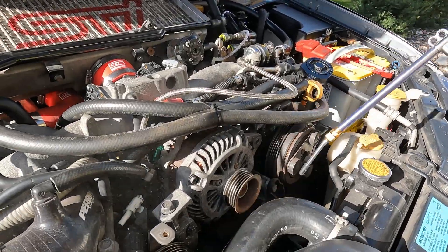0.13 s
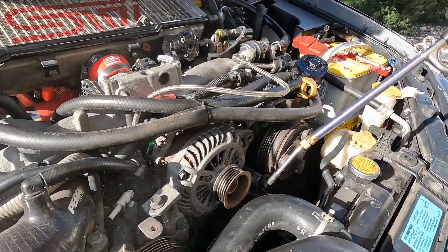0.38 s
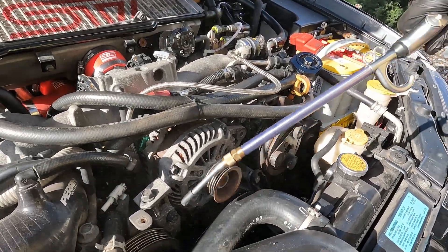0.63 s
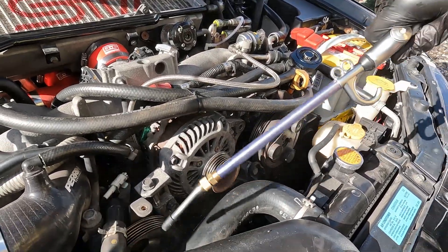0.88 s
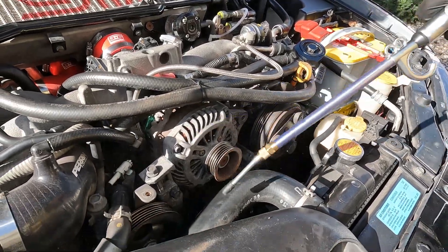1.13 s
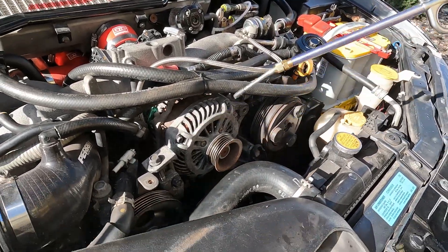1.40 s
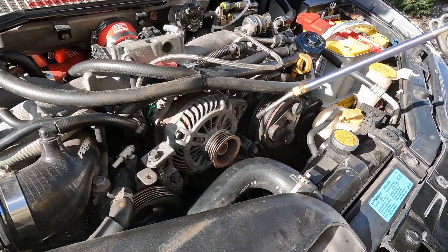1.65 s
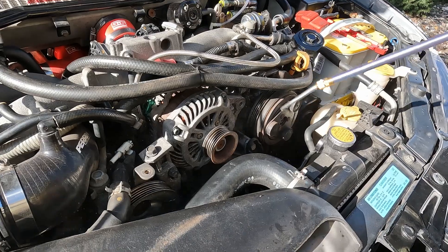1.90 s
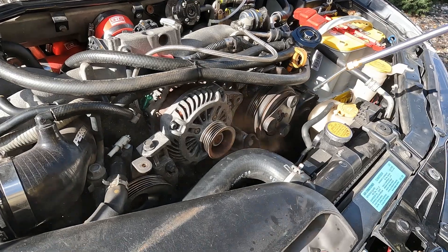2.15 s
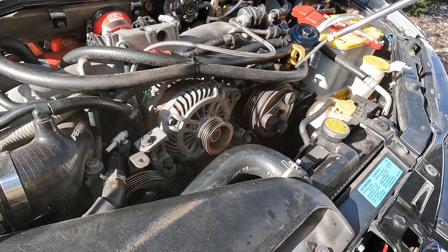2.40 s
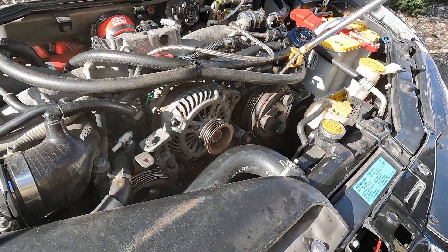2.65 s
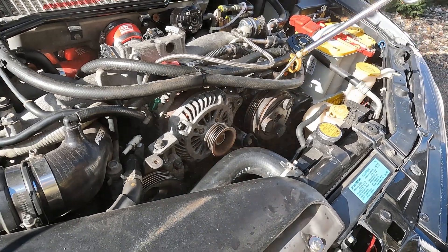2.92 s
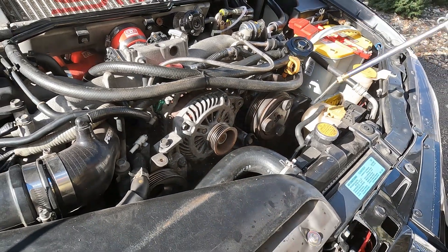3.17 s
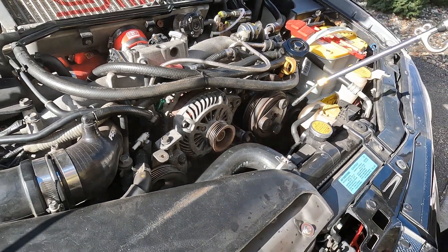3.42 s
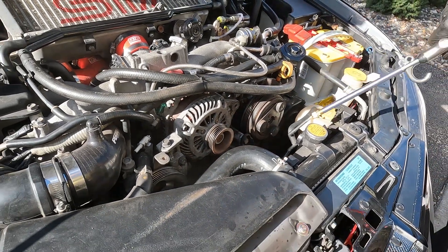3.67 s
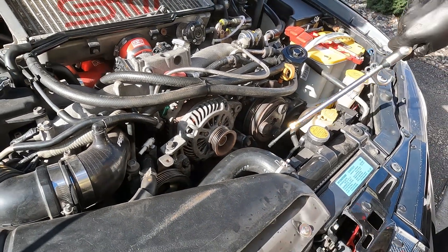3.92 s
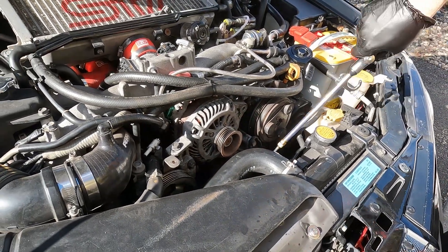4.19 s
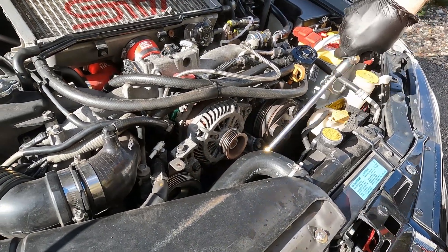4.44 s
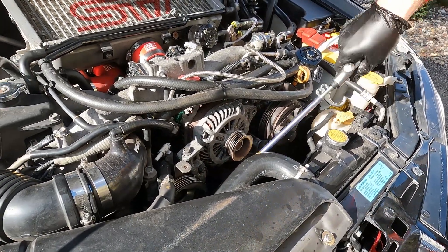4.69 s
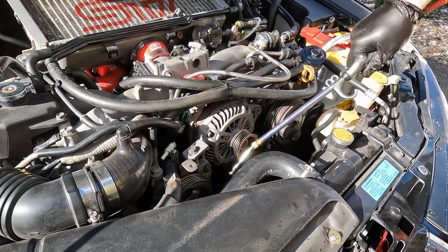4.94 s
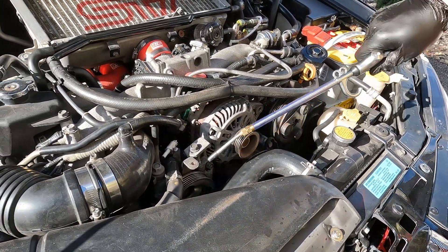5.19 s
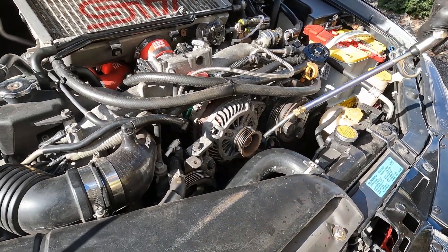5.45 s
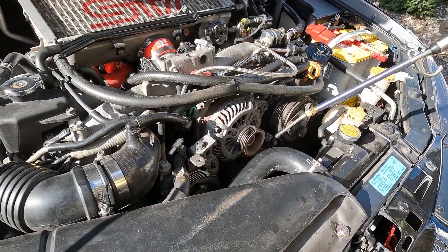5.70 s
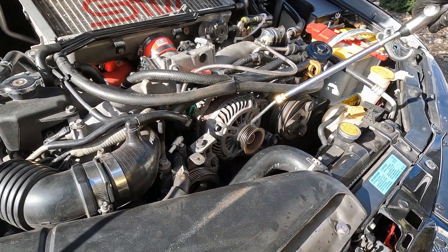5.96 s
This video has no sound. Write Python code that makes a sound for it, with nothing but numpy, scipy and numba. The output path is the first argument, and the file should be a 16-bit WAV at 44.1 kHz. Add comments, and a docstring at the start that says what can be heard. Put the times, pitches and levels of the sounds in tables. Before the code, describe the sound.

Close, continuous air-jet blast waved across engine parts outdoors, fluttering between bright hiss, hollow roar and sharp rasp, with brief breathy whistles and low wind buffeting.

```python
"""A free air jet from a blowgun is waved over the hollows, edges and gaps of an engine bay, near a microphone.
From the start the jet hisses and stirred air rocks the microphone; shear noise roars in hollows, honks in
deep gaps and rasps on edges, and thin parts flick through the stream. From half a second small holes whistle,
mostly after 3.8 s. The slow rocking sinks near 1.9 s and is strongest near 5.1 s. Each source is shaped
noise, and short dense echoes follow all but the slow air."""
import sys
import numpy as np
from scipy import signal
from scipy.fft import rfft, irfft
from scipy.io import wavfile
from scipy.ndimage import uniform_filter1d
from numba import njit

SR = 44100
rng = np.random.default_rng(int(sys.argv[2]) if len(sys.argv) > 2 else 0)


def field_ratio(decibels):
    """Amplitude ratio for a level in dB (20 dB per decade); scalars and array-likes work."""
    return 10 ** (np.asarray(decibels, dtype=float) / 20)


def materialize(psi):
    """Save the field psi as 16-bit PCM at rate SR to the path in sys.argv[1].

    A 1-D psi becomes a single channel; in a 2-D psi each row is a channel.
    """
    bounded = np.clip(np.atleast_2d(psi).T, -1, 1)
    quanta = np.round(bounded * 32767).astype(np.int16)
    wavfile.write(sys.argv[1], SR, quanta)


N = 268128

# spectrum of the bare jet: frequency_hz, relative_db
JET_SPECTRUM = [(35, -40), (60, -5), (168, -11), (371, -4), (924, -10), (1950, -2), (2650, -5), (6740, -3),
                (8510, -6.5), (12700, -2), (14900, -2.5), (16000, -3)]
# spectrum of slow air pressure on the microphone: frequency_hz, relative_db
DRAUGHT_SPECTRUM = [(1, 0), (3, -0.5), (8, -14), (20, -19), (40, -37.5), (80, -43), (250, -56.5)]
# strength of the stirred air: time_s, level_db
DRAUGHT_LEVEL = [(0.0, -33), (0.22, -34), (0.36, -35), (1.68, -35), (1.86, -46), (2.69, -35), (2.78, -40),
                 (3.69, -36), (4.15, -43), (4.33, -37), (4.47, -44), (4.66, -32), (5.11, -29.5),
                 (5.33, -31), (5.74, -46.5), (6.08, -31.5)]
# jet over deep gaps of the bay: start_s, length_s, honk_db, resonance_hz, rumble_db (against the honk)
DEEP_PASSES = [(0.03, 0.13, -40.0, 1310, -10.0), (0.183, 0.13, -36, 1340.0, -12),
               (0.293, 0.11, -37, 1290.0, -9), (0.453, 0.24, -33.5, 1310, -8.5),
               (0.63, 0.03, -36, 1200, -10), (0.66, 0.11, -31, 1300, -21), (0.77, 0.041, -34.5, 1000, -7),
               (0.817, 0.18, -35.5, 1270, -9.5), (1.024, 0.067, -37.0, 1200.0, -5),
               (1.126, 0.064, -37, 1200.0, -8), (1.225, 0.18, -33, 1250, -15),
               (1.401, 0.26, -37, 1370, -7.5), (1.563, 0.29, -43.5, 1240.0, -15),
               (1.793, 0.051, -33, 1330, -26), (1.871, 0.089, -35.5, 1140.0, -20),
               (1.963, 0.15, -30.5, 1210, -14), (2.133, 0.061, -40, 1220.0, -23),
               (2.208, 0.069, -43, 1190.0, -3), (2.291, 0.18, -37.5, 1280, -14.0),
               (2.464, 0.081, -37.5, 1210.0, -22), (2.819, 0.15, -34, 1200.0, -18),
               (3.035, 0.22, -47.5, 1050, 2), (3.245, 0.062, -32, 1220, -9),
               (3.312, 0.31, -39.5, 1260, -21), (3.482, 0.1, -33, 1020, -10),
               (3.548, 0.18, -29.0, 1290, -19), (3.797, 0.081, -28, 1110, -16),
               (3.929, 0.23, -35.0, 1220, -5.5), (4.013, 0.067, -32, 1260, -26),
               (4.116, 0.28, -42.5, 1120, -2.5), (4.438, 0.19, -37.5, 1310, -10.5),
               (4.66, 0.13, -38, 1320, -15), (4.76, 0.1, -36, 1300, -8.5), (4.87, 0.17, -52, 960, 9),
               (5.027, 0.088, -30.5, 1230, -19), (5.1, 0.11, -32, 880, -14), (5.265, 0.19, -35.0, 1250, -8),
               (5.416, 0.075, -27.5, 1150, -16), (5.528, 0.1, -38, 1350.0, -8),
               (5.651, 0.051, -36, 1280.0, -12), (5.743, 0.11, -38.5, 1290, -6.5),
               (6.06, 0.045, -37, 1200, -15)]
# jet over hollows between parts: start_s, length_s, roar_db, resonance_hz
HOLLOW_PASSES = [(0.052, 0.093, -26.5, 2500), (0.196, 0.086, -30.5, 2320.0), (0.313, 0.075, -29, 2300),
                 (0.437, 0.17, -28.5, 2390.0), (0.474, 0.038, -20, 2380), (0.657, 0.097, -24.0, 2450),
                 (0.774, 0.076, -33.5, 2310), (0.872, 0.047, -25.0, 2300), (0.946, 0.033, -24, 2730),
                 (1.0, 0.035, -32, 2600), (1.052, 0.038, -24.5, 2450), (1.135, 0.048, -24, 2720),
                 (1.234, 0.135, -25.5, 2700), (1.427, 0.025, -22, 2150), (1.452, 0.07, -21.5, 2350),
                 (1.543, 0.096, -23, 2480), (1.649, 0.088, -23, 2550.0), (1.797, 0.04, -25.5, 2260),
                 (1.896, 0.096, -26.5, 2150), (2.01, 0.13, -29.5, 2420.0), (2.136, 0.19, -30.5, 2980),
                 (2.363, 0.081, -30.5, 2250.0), (2.465, 0.077, -30.5, 1970), (2.55, 0.054, -27.5, 2620),
                 (2.717, 0.076, -36.5, 2430.0), (2.84, 0.063, -32.5, 1800), (2.905, 0.07, -27, 1960),
                 (2.965, 0.064, -31, 2650), (3.054, 0.019, -21.5, 2760), (3.096, 0.023, -31, 2700.0),
                 (3.204, 0.16, -32, 2340.0), (3.265, 0.035, -23, 2260.0), (3.357, 0.037, -32.5, 2400),
                 (3.418, 0.09, -30.5, 2840), (3.567, 0.12, -26.0, 2260.0), (3.807, 0.068, -27.5, 1790),
                 (3.914, 0.036, -42, 2110.0), (4.005, 0.095, -27.5, 2330), (4.121, 0.12, -37, 2550.0),
                 (4.246, 0.045, -29.5, 2540.0), (4.26, 0.17, -41.0, 2520), (4.434, 0.18, -37.5, 2380),
                 (4.508, 0.025, -26.5, 2070.0), (4.644, 0.13, -39.5, 2830), (4.767, 0.06, -31.5, 3040.0),
                 (4.842, 0.034, -38, 2940.0), (5.026, 0.065, -23, 2700.0), (5.09, 0.13, -28.5, 2200),
                 (5.196, 0.04, -20.5, 2430), (5.235, 0.045, -29, 2500), (5.293, 0.043, -22, 2160),
                 (5.384, 0.09, -27.5, 2370), (5.506, 0.1, -20.5, 2370), (5.657, 0.056, -28.5, 2220),
                 (5.744, 0.094, -23.5, 2160), (5.861, 0.059, -40.0, 2230.0), (5.936, 0.085, -36.5, 2140),
                 (6.062, 0.04, -28.5, 2600)]
# thin parts in the stream: start_s, nominal_peak_db, centre_hz, length_ms (three rise times)
FLICKS = [(0.0548, -27, 2340, 8), (0.1311, -8.5, 6850, 11), (0.6763, -14, 2170, 8), (0.88, -16, 7200, 8.9),
          (0.953, -13, 2820, 9.4), (1.0635, -11, 11200, 8.5), (1.257, -10, 2670, 4.8),
          (1.4331, -13.5, 2170, 5.4), (1.545, -6.5, 2850, 9.1), (1.6213, -9.5, 7300, 8),
          (1.929, -23, 2110, 8), (2.0672, -10.5, 2660, 7.1), (2.092, -11, 6260, 9.3),
          (2.5391, -6.5, 9300, 7.3), (3.4166, -14, 12400, 8), (3.6057, -19, 1750, 7.6),
          (4.15, -26, 4060, 8), (5.2001, -19, 2200, 10), (5.5238, -18, 2320, 8), (5.5667, -27, 2200, 8),
          (5.658, -14, 6840, 12), (5.735, -18, 2330, 13)]
# tip near a surface that throws its hiss back: start_s, length_s, hiss_db, top_db (against the hiss)
NOZZLE_PASSES = [(0.064, 0.086, -33, 2), (0.359, 0.057, -38, 3.0), (0.437, 0.055, -36.0, 2.0),
                 (0.604, 0.133, -36, 0), (0.883, 0.068, -25.5, -2), (1.068, 0.018, -21.5, 3),
                 (1.098, 0.063, -29, -1), (1.286, 0.043, -29, -1.0), (1.356, 0.2, -34, 0.0),
                 (1.535, 0.017, -27, -2), (1.615, 0.023, -28, -1), (1.663, 0.04, -25.5, -3),
                 (1.844, 0.065, -30.5, 2.0), (2.081, 0.052, -30, 3), (2.352, 0.096, -36, 11),
                 (2.469, 0.026, -39, 1.0), (2.536, 0.02, -29, -2.0), (2.585, 0.1, -28.5, 2),
                 (2.939, 0.14, -29, 1.0), (3.26, 0.2, -36, 2.0), (3.293, 0.027, -26, 0.0),
                 (4.235, 0.056, -41, -0.0), (4.467, 0.095, -31, 2), (4.606, 0.099, -29.5, -2),
                 (5.062, 0.138, -35, 3.0), (5.215, 0.084, -28, -1), (5.418, 0.11, -37, 3.0),
                 (5.609, 0.03, -30, 0.0), (5.66, 0.096, -29, -2), (5.832, 0.094, -32, 7),
                 (5.903, 0.02, -39, 7.0), (6.044, 0.037, -31, 4.0)]
# bare tip turning towards and away from the microphone: time_s, hiss_db
TIP_AIM = [(0.0, -53), (0.35, -36.0), (0.9, -39), (1.75, -45), (2.2, -30.5), (2.9, -36), (3.12, -40.0),
           (3.35, -33.0), (4.3, -40.0), (4.6, -37), (4.95, -38.5), (5.55, -37.0), (5.78, -43), (5.9, -35),
           (6.08, -32)]
# jet torn on edges: start_s, length_s, rasp_db, centre_hz
EDGE_PASSES = [(0.072, 0.073, -23.5, 6170), (0.225, 0.046, -30.5, 5800.0), (0.337, 0.1, -30.5, 6200),
               (0.448, 0.072, -29.5, 5040), (0.531, 0.11, -31.5, 6100), (0.661, 0.044, -25, 6100),
               (0.717, 0.014, -19, 5530.0), (0.756, 0.143, -35.0, 6100), (0.879, 0.049, -21.5, 6400),
               (0.939, 0.022, -22, 5810.0), (1.057, 0.052, -21.5, 6200), (1.133, 0.029, -22.5, 6100),
               (1.185, 0.17, -36.0, 5140.0), (1.284, 0.037, -23, 4990.0), (1.433, 0.11, -24.5, 5300),
               (1.538, 0.016, -20, 6370.0), (1.609, 0.11, -24.5, 6020.0), (1.811, 0.075, -29.0, 5860.0),
               (1.92, 0.043, -28.5, 5150.0), (1.984, 0.044, -30.5, 5730.0), (2.062, 0.048, -24.5, 6160.0),
               (2.133, 0.2, -23.5, 6400), (2.371, 0.065, -26.5, 5200), (2.46, 0.19, -26, 5900),
               (2.718, 0.086, -35, 6150.0), (2.8, 0.17, -31.0, 6400), (2.917, 0.191, -31.5, 6060),
               (3.04, 0.041, -23.5, 5850.0), (3.214, 0.039, -28, 4380), (3.268, 0.049, -25, 6300),
               (3.331, 0.055, -33, 6590.0), (3.42, 0.081, -21.5, 6040), (3.552, 0.14, -27.5, 5630.0),
               (3.705, 0.097, -35.5, 5880.0), (3.796, 0.068, -32.5, 5050), (3.864, 0.11, -35, 5700.0),
               (4.005, 0.11, -25.5, 4590.0), (4.152, 0.062, -24.5, 5300), (4.242, 0.061, -30.5, 5030),
               (4.339, 0.11, -36, 4940), (4.469, 0.1, -27, 5270), (4.572, 0.16, -27.5, 6240),
               (4.761, 0.085, -31.0, 5310.0), (4.879, 0.21, -36.5, 5570.0), (5.019, 0.049, -26.0, 5290.0),
               (5.076, 0.107, -33.0, 5770.0), (5.193, 0.13, -26, 5830.0), (5.222, 0.037, -22.5, 5930.0),
               (5.383, 0.085, -33.0, 5370.0), (5.48, 0.062, -29.5, 4940.0), (5.572, 0.068, -29.5, 4700),
               (5.647, 0.07, -26.5, 6810.0), (5.729, 0.021, -21, 5380.0), (5.801, 0.11, -31.0, 5960),
               (6.032, 0.26, -27.5, 6710.0)]
# small holes blown like a bottle: start_s, end_s, pitch_hz, width_hz (of each filter stage), level_db
WHISTLES = [(.47, 0.52, 2390, 500, -21.5), (1.235, 1.288, 2740, 150, -39), (4.03, 4.096, 4150, 250, -26),
            (4.144, 4.213, 5200, 350, -25), (4.15, 4.19, 4120, 200, -36), (4.24, 4.29, 5090, 200, -33),
            (4.329, 4.418, 5080, 200, -33), (4.43, 4.473, 3530, 250, -34), (4.498, 4.566, 5300, 300, -27),
            (4.77, 4.84, 3450, 250, -28.5), (4.841, 4.888, 3040, 150, -34), (4.846, 5.04, 6300, 60, -43),
            (5.637, 5.725, 7000, 300, -26), (5.531, 5.626, 2210, 300, -22.5), (5.44, 5.493, 1180, 200, -33),
            (3.81, 3.859, 1010, 250, -27.5)]


def unit(x):
    """Normalisation to an rms of 1."""
    return x / np.sqrt(np.mean(x ** 2))


def columns(table):
    """Linear interpolation of each column of a curve table at every sample."""
    time_s, *values = np.transpose(table)
    return [np.interp(np.arange(N) / SR, time_s, v) for v in values]


def passes(table, rest_db, *rest):
    """Power summation of passes over a resting level in dB; further columns are averaged by power."""
    t = np.arange(0, N, 64) / SR
    start, length, db, *others = np.transpose(table)[:, :, None]
    # the rim of the jet crosses the part gradually: slow passes have slow rims
    ramp_s = 0.002 + 0.28 * length
    fade_in = (1 + np.tanh((t - start) / ramp_s)) / 2
    fade_out = (1 + np.tanh((start + length - t) / ramp_s)) / 2
    power = (field_ratio(db) * fade_in * fade_out) ** 2
    rest_power = field_ratio(2 * rest_db)
    total = rest_power + power.sum(axis=0)
    means = [(rest_power * r + (power * c).sum(axis=0)) / total for r, c in zip(rest, others)]
    return [np.interp(np.arange(N) / SR, t, v) for v in [10 * np.log10(total)] + means]


@njit
def svf(x, hz, width):
    """State-variable band-pass resonance whose centre and width move every sample."""
    y, band_state, low_state = np.empty(len(x)), 0., 0.
    for i in range(len(x)):
        g = np.tan(np.pi * hz[i] / SR)
        damping = width[i] / hz[i]
        v = (band_state + g * (x[i] - low_state)) / (1 + g * (g + damping))
        band_state = 2 * v - band_state
        low_state += 2 * g * v
        y[i] = damping * v
    return y


def band(hz, q, size=N):
    """Two cascaded resonances driven by white noise, with even power while the centre moves."""
    hz = np.clip(hz * np.ones(size), 50, .4 * SR)
    once = svf(rng.standard_normal(size), hz, hz / q)
    twice = svf(once, hz, hz / q)
    return unit(twice / np.sqrt(hz))  # bandwidth, and so power, grows with the centre


def coloured(spectrum):
    """Spectral shaping of steady noise, interpolated over log frequency, to an rms of 1."""
    hz, db = np.transpose(spectrum)
    f = np.arange(N // 2 + 1) * SR / N + 1e-3  # keeps the logarithm finite at 0 Hz
    gain = field_ratio(np.interp(np.log(f), np.log(hz), db))
    return unit(irfft(rfft(rng.standard_normal(N)) * gain, N))


def walk(rate):
    """Smoothed random steps, each held about 1 / rate s; their spread is near 1."""
    hold = int(SR / rate)
    steps = np.repeat(rng.standard_normal(N // hold + 1), hold)
    return 1.3 * uniform_filter1d(uniform_filter1d(steps, hold), hold)[:N]


def buffet(slow_db, fast_db):
    """Turbulent modulation by breaking eddies: a flutter and a fine rasp, with mean power 1."""
    return unit(field_ratio(slow_db * walk(30) + fast_db * walk(250)))


def bare_jet():
    """Turbulent mixing of the free jet with still air, as steady broadband hiss."""
    return field_ratio(-33) * coloured(JET_SPECTRUM)


def draught():
    """Slow pressure of stirred air: a common part and a weaker part opposed at the two ports."""
    common = coloured(DRAUGHT_SPECTRUM)
    opposed = field_ratio(-13.5) * coloured(DRAUGHT_SPECTRUM) * np.array([[1], [-1]])
    return field_ratio(columns(DRAUGHT_LEVEL)[0]) * (common + opposed)


def deep():
    """Cavity resonance of deep gaps: a honk round a moving centre and the broad rumble of the whole bay."""
    honk_db, hz, rumble_db = passes(DEEP_PASSES, -60, 1400, 4.5)
    honk = unit(band(hz, q=1.29) + field_ratio(-6.5) * band(710, q=0.66))
    honk = honk * buffet(slow_db=0, fast_db=0.5)
    rumble = band(363, q=0.43) * buffet(slow_db=0.5, fast_db=0.5)
    return field_ratio(honk_db) * (honk + field_ratio(rumble_db) * rumble)


def hollows():
    """Broad cavity resonance: turbulence roars round a wavering centre and in a wide skirt."""
    roar_db, hz = passes(HOLLOW_PASSES, -67, 2100)
    resonance = band(hz * (1 + 0.023 * walk(25.07)), q=1.42)
    skirt = field_ratio(-0.5) * band(2310, q=0.98)
    return field_ratio(roar_db) * buffet(slow_db=0.3, fast_db=1.5) * unit(resonance + skirt)


def flicks():
    """Impulsive interruption of the stream: noise puffs with a quick rise and a slower fall."""
    size, crest_db = 4096, 9.5  # samples; peak of a noisy puff over its rms
    out, t = np.zeros(N + size), np.arange(size) / SR
    for start_s, peak_db, hz, length_ms in FLICKS:
        u = t / (length_ms / 1000 / 3)
        envelope = u * np.exp(1 - u)
        i = int(start_s * SR)
        out[i:i + size] += field_ratio(peak_db - crest_db) * envelope * band(hz, q=1.5, size=size)
    return out[:N]


def nozzle():
    """Small-scale turbulence at the tip: a hiss band and a top band that share their eddies."""
    hiss_db, top_db = passes(NOZZLE_PASSES, columns(TIP_AIM)[0][::64], 1.5)
    top = unit(band(12600, q=3.7) + field_ratio(1.5) * band(14700, q=2.4))
    hiss = band(10400, q=1.8) + field_ratio(top_db) * top
    return field_ratio(hiss_db) * buffet(slow_db=0.5, fast_db=0) * hiss


def edges():
    """Shear noise on edges: a moving rasp over a broad band, with the bay's fixed ring near the top."""
    rasp_db, hz = passes(EDGE_PASSES, -56.5, 5200)
    rasp = band(hz * (1 + 0.024 * walk(25.26)), q=1.66)
    broad = field_ratio(2.5) * band(4120, q=0.76)
    ring = field_ratio(-1) * band(7030, q=3.7)
    return field_ratio(rasp_db) * buffet(slow_db=0.5, fast_db=1.27) * unit(rasp + broad + ring)


def whistles():
    """Resonance of small blown holes: narrow noise that swells and fades as the jet crosses each."""
    out = np.zeros(N)
    for start_s, end_s, hz, width_hz, db in WHISTLES:
        i, n = int(start_s * SR), int((end_s - start_s) * SR)
        out[i:i + n] += field_ratio(db) * np.sqrt(np.hanning(n)) * band(hz, q=hz / width_hz, size=n)
    return out


def reflections(x, hop, decay_ms, wet_db):
    """Multiple reflection in crowded metal: dense echoes vary as the tip moves, so narrow rings come and go."""
    count = N // hop + 2
    index = hop * np.arange(count)[:, None] + np.arange(2 * hop)
    frames = np.pad(x, (hop, 3 * hop))[index]
    decay = np.exp(-np.arange(hop) / SR * 1000 / decay_ms)
    echoes = rng.standard_normal((count, hop)) * decay
    echoes = field_ratio(wet_db) * echoes / np.linalg.norm(echoes, axis=1, keepdims=True)
    # unrelated patterns cross-fade at equal power
    fade = np.sin(np.pi * np.arange(2 * hop) / (2 * hop))
    wet = irfft(rfft(frames * fade, 3 * hop) * rfft(echoes, 3 * hop), 3 * hop)
    # overlap-add: each convolved frame spans three hops
    wet = wet.reshape(count, 3, hop)
    out = sum(np.pad(wet[:, k].ravel(), (k * hop, (2 - k) * hop)) for k in range(3))
    return (x + out[hop:hop + N]) / np.sqrt(1 + field_ratio(2 * wet_db))


def gated_side(air):
    """Side signal, no source in the bay: a faint delayed copy, opposed in the channels, let in at random moments."""
    gate = np.clip(4 * (walk(30) - 1.1), 0, 1)
    return field_ratio(-14) * gate * np.roll(air, 700) * np.array([[1], [-1]])  # delay in samples


def scene():
    """Superposition of all sources in front and slow air that differs by port; a random side signal is added."""
    # one flapping jet drives every surface, so part of the flutter is common to all
    common_flutter = buffet(slow_db=0.77, fast_db=1.36)
    struck = common_flutter * (deep() + hollows() + nozzle() + edges())
    air = bare_jet() + struck + flicks() + whistles()
    air = reflections(air, hop=1024, decay_ms=4, wet_db=-4.5)
    return air + gated_side(air) + draught()


def roll_off(x):
    """The treble ends steeply here."""
    return signal.sosfilt(signal.butter(12, 17040, fs=SR, output="sos"), x)


def record(dry):
    """Dynamic compression: gain control holds down loud gusts, then a steep low-pass cuts the top."""
    limit_db, ratio = -20.5, 1.67
    over = uniform_filter1d(np.mean(dry ** 2, axis=0), size=600) / field_ratio(2 * limit_db)
    held = dry * (1 + over ** 2) ** (-(1 - 1 / ratio) / 4)  # soft knee on power
    low_pass = signal.ellip(14, .2, 80, 15750, fs=SR, output="sos")
    mix = signal.sosfilt(low_pass, held)
    return roll_off(mix)


dry = scene()
out = record(dry)
materialize(out)
```